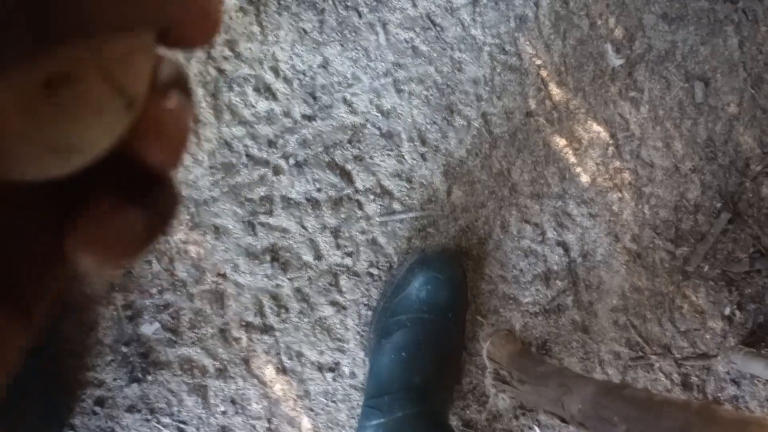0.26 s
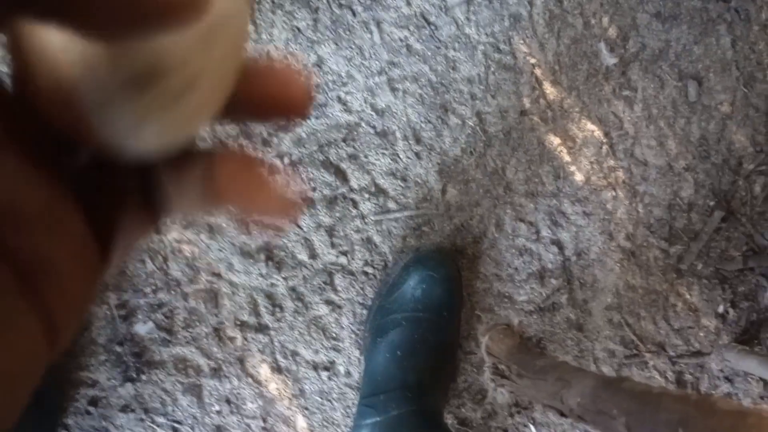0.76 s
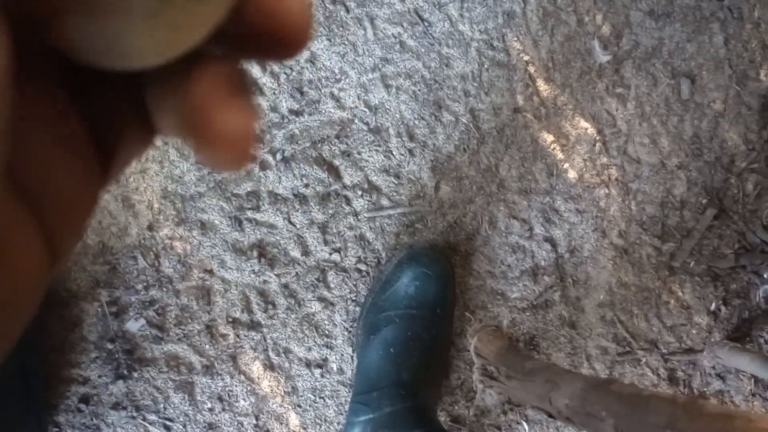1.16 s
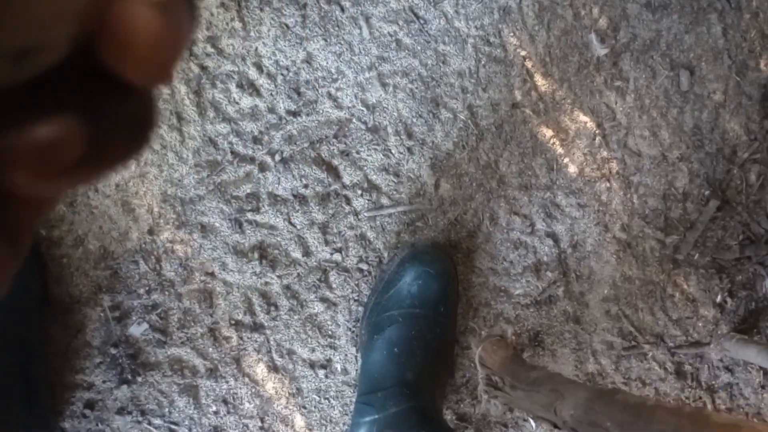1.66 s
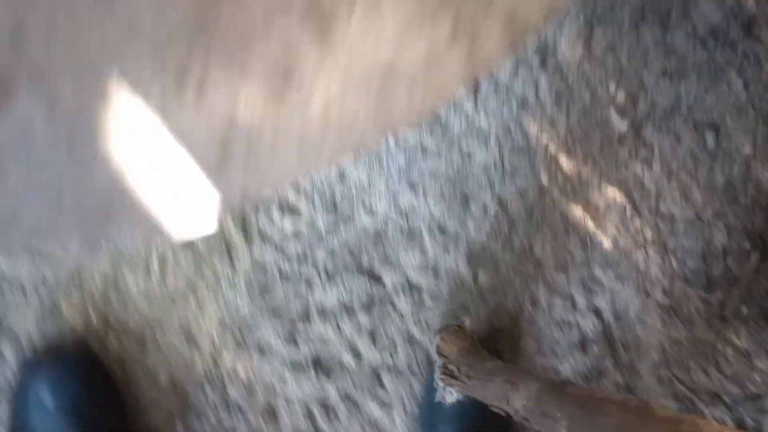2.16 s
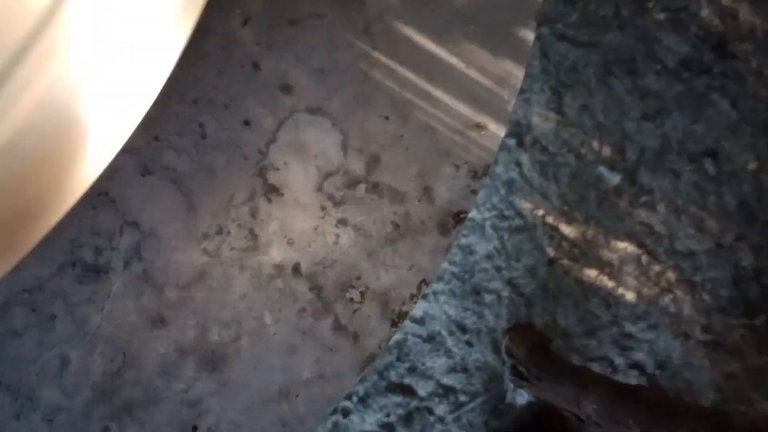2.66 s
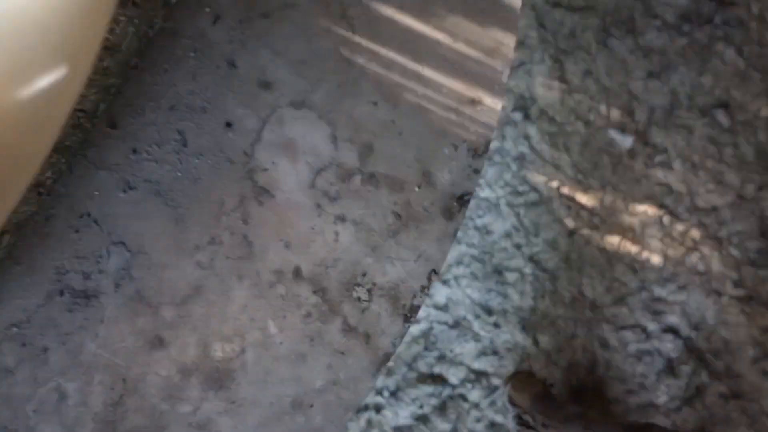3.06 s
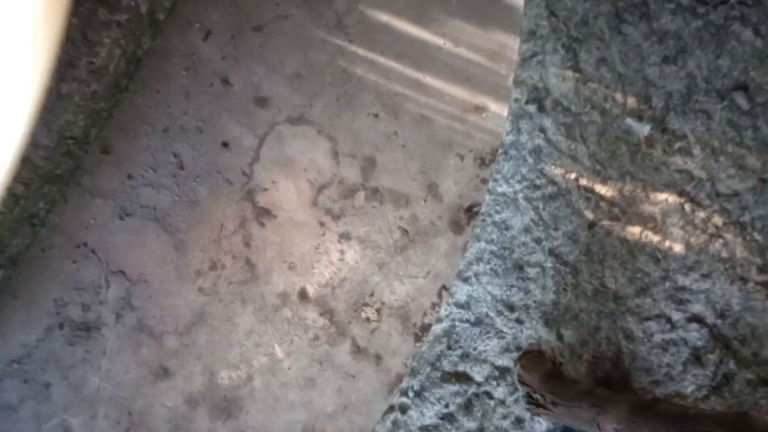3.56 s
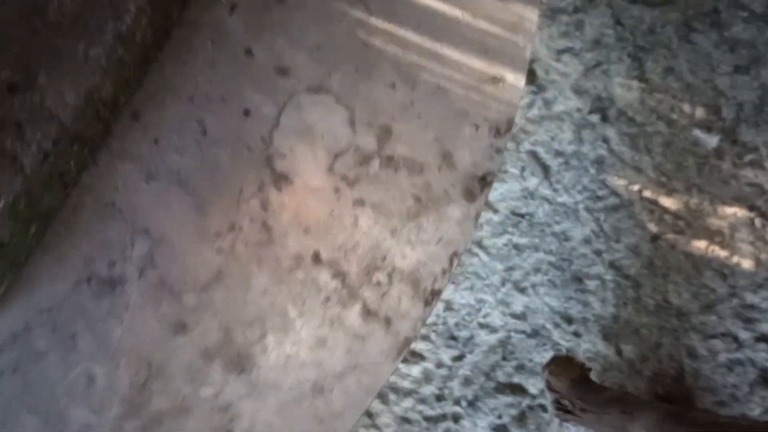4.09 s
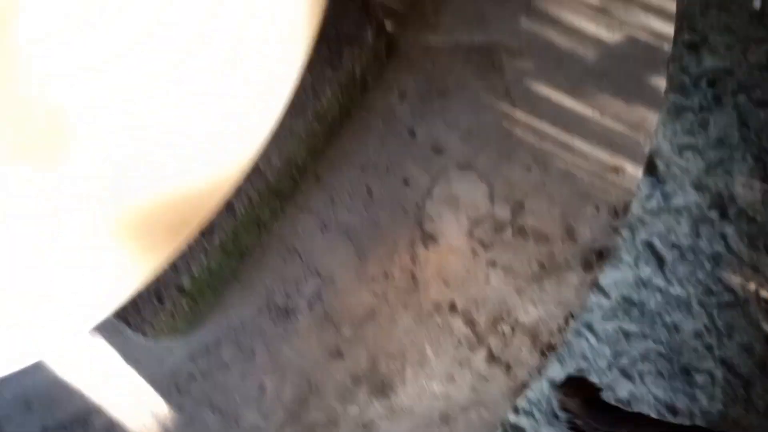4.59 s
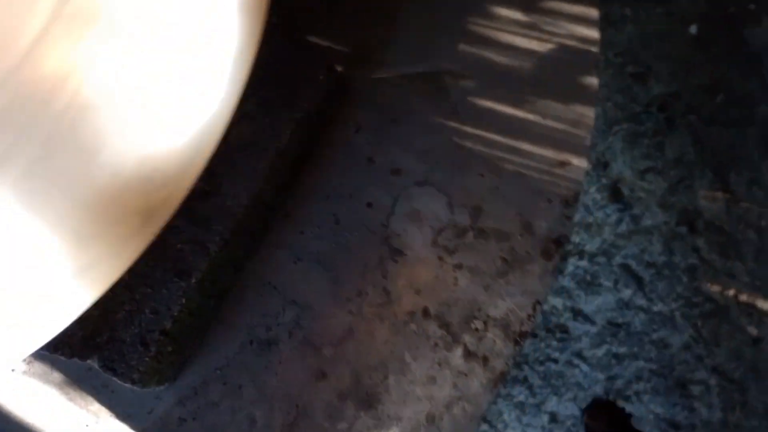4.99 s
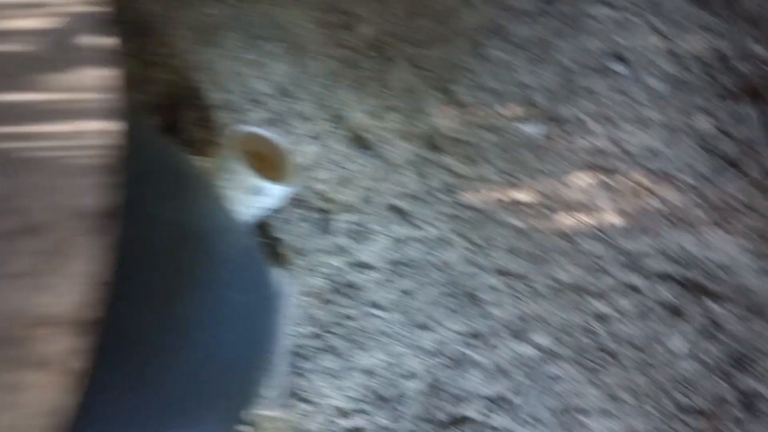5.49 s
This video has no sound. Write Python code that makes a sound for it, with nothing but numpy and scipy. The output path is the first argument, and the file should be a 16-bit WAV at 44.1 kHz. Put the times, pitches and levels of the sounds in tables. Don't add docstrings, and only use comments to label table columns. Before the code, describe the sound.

Faint falling whistles and far clucks in a quiet pen, then a harsh bird rattle, a sudden loud turkey gobble, and nearer rasping calls.

```python
import sys
import numpy as np
from scipy import signal
from scipy.fft import rfft, irfft, next_fast_len
from scipy.io import wavfile
from scipy.ndimage import uniform_filter1d, minimum_filter1d

SR = 44100
rng = np.random.default_rng(int(sys.argv[2]) if len(sys.argv) > 2 else 0)


def persist_wave(psi):
    counts = np.round(np.clip(psi, -1, 1) * 32767).astype(np.int16)
    wavfile.write(sys.argv[1], SR, np.atleast_2d(counts).T)


def boost(x):
    u = np.asarray(x, float) / 20
    return 10 ** u


N = 253134

# (start [s], hold [s], level [dB], upper partials [dB], beak opening: 2nd over 1st partial [dB])
GOBBLE = [(2.55, 0.0067, -11.5, -31, 22), (2.565, 0.022, -6.5, -21, 16), (2.606, 0.015, -10, -20, 19.5),
          (2.629, 0.027, -23.5, -20.5, -10.5), (2.648, 0.0036, -31, -20, 30.5),
          (2.666, 0.003, -10.5, -30.5, -26.5), (2.712, 0.022, -27.5, -27.5, 3),
          (2.777, 0.044, -18, -30.5, -2), (2.819, 0.011, -12.5, -16.5, -7.5),
          (2.84, 0.033, -18, -23.5, -7.5), (2.881, 0.0044, -29.5, -30, -6.5), (2.92, 0.0089, -31, -38.5, 8),
          (2.973, 0.0046, -19, -27, 1.5), (2.993, 0.0052, -26, -34.5, -7.5), (3.053, 0.035, -24, -28, -7),
          (3.122, 0.016, -28.5, -29, -1), (3.176, 0.018, -25.5, -30.5, -2.5),
          (3.227, 0.036, -24.5, -27, -4.5), (3.262, 0.033, -40, -35.5, 21),
          (3.315, 0.0039, -25.5, -47.5, 22), (3.397, 0.041, -25.5, -25, -4)]
# (time [s], pitch [Hz])
GOBBLE_PITCH = [(2.55, 610), (2.566, 625), (2.575, 694.4), (2.598, 687.6), (2.61, 627.5), (2.626, 717),
                (2.644, 774.7), (2.7, 735.4), (2.718, 701), (2.76, 665), (2.782, 660), (2.822, 638),
                (2.838, 766), (2.85, 783.6), (2.864, 809), (2.875, 770.3), (2.886, 631), (2.91, 632),
                (2.925, 681), (2.946, 627), (2.97, 642), (3.02, 658.6), (3.052, 635.6), (3.075, 697),
                (3.095, 680), (3.105, 647.5), (3.122, 658), (3.133, 711), (3.15, 706.5), (3.165, 680.5),
                (3.19, 640), (3.215, 629.6), (3.228, 668.5), (3.255, 690), (3.268, 635.5), (3.292, 637),
                (3.31, 653), (3.325, 600), (3.345, 555.4), (3.396, 633.7), (3.415, 696.5), (3.434, 663),
                (3.48, 640)]
# (multiple, level [dB])
GOBBLE_UPPER = [(4, 10), (5, 10), (6, 5), (7, -12), (8, -25.5)]
# (start [s], hold [s], level [dB])
BOOMS = [
    (2.517, 0.019, -50),
    (2.674, 0.1, -50),
    (2.873, 0.037, -41.5),
    (3.014, 0.095, -45),
    (3.157, 0.13, -44.5),
    (3.353, 0.036, -44),
]
# (start [s], hold [s], effort [dB], throat peak
# [Hz])
RATTLE_NOTES = [(1.415, 0.14, -67.5, 3700), (1.555, 0.19, -60, 3900), (1.75, 0.0086, -41, 2830),
                (1.837, 0.019, -35.5, 2640), (1.946, 0.0041, -40, 3200), (2.045, 0.014, -44, 3000),
                (2.153, 0.0021, -40.5, 3200), (2.261, 0.023, -43.5, 2760), (2.349, 0.014, -41.5, 2720),
                (2.44, 0.017, -44, 2910), (2.496, 0.044, -41.5, 4160), (2.625, 0.024, -28, 3470),
                (2.752, 0.0026, -23.5, 3530), (2.9, 0.0046, -29, 3230), (2.946, 0.0089, -23.5, 3600),
                (3.135, 0.0068, -25, 3250), (3.258, 0.011, -25.5, 3440), (3.351, 0.014, -30.5, 4072),
                (3.461, 0.0057, -32, 2790), (3.568, 0.015, -31, 3134), (3.666, 0.018, -27.5, 3150),
               (3.793, 0.018, -29, 2760), (3.97, 0.03, -25.5, 4040), (4.042, 0.0043, -26.5, 4460),
               (4.107, 0.037, -21, 3520), (4.206, 0.04, -20.5, 3880), (4.294, 0.37, -26.5, 3760),
               (4.801, 0.016, -23, 4310), (4.936, 0.011, -21, 3970), (5.187, 0.038, -24, 3820),
               (5.595, 0.026, -25, 2950), (5.615, 0.069, -26.5, 3700)]
# (frequency [Hz], level [dB per Hz])
RATTLE_COLOUR = [(290, -66), (500, -21), (587, -34), (785, -8.5), (893, -7.5), (1040, -8), (1420, 9.5),
                 (2530, 3.5), (3070, -0.5), (3880, -0.5), (5400, -13.5), (6500, -23), (8450, -47),
                 (13300, -45), (15600, -62.5)]
# (frequency [Hz], level [dB per Hz])
HISS_COLOUR = [(2940, -13), (5000, 1.5), (7210, -10.5), (9050, -14), (12100, -25), (13900, -26),
               (15600, -43.5)]
# (centre [Hz], width [Hz], level [dB])
THROAT = [(1710, 216, -8), (2210, 32, 4.5), (3200, 190, 5), (4530, 590, 16.5)]
# (time [s], level above effort [dB])
NEARING = [(1.7, -11), (1.9, -27), (2.5, -11), (3.5, -3), (4.27, -8.5), (4.33, -10.5), (4.52, -19.5),
           (4.57, -10.5), (4.85, -6), (5.3, -6)]
# (time [s], depth, negative = half a beat late)
TRILL = [(1.4, 0), (1.43, -.6), (1.52, -.6), (1.55, .65), (1.72, .65), (1.75, 0), (4.16, 0), (4.19, .5),
         (4.23, .2), (4.28, .2), (4.3, .8), (4.47, .75), (4.56, .5), (4.6, .3), (4.72, .5), (4.8, 0)]
# (start [s], hold [s], level [dB], pitch [Hz])
HUM = [(4.003, 0.0067, -54, 310), (4.115, 0.018, -49.5, 312), (4.19, 0.049, -46.5, 308),
       (4.245, 0.29, -46.5, 306), (4.6, 0.095, -53.5, 306), (4.815, 0.031, -53.5, 310),
       (4.95, 0.047, -49.5, 310), (5.212, 0.021, -45, 315), (5.625, 0.13, -54, 312)]
# (start [s], hold [s], level [dB], pitch [Hz])
PIPE = [(1.45, 0.055, -60.5, 1355), (1.56, .14, -56, 1340), (1.765, 0.016, -46, 1390),
        (1.862, 0.016, -45, 1365), (1.972, 0.0056, -50.5, 1400), (2.075, 0.0043, -54, 1400),
        (3.488, 0.0035, -36, 1360), (3.51, 0.24, -48, 1385), (3.785, 0.034, -31.5, 1390),
        (3.86, 0.043, -43, 1405), (3.985, 0.042, -44, 1400), (4.048, 0.0033, -32, 1390),
        (4.11, 0.03, -50.5, 1300), (4.325, 0.045, -25, 1400), (4.43, 0.074, -32, 1509),
        (4.57, 0.07, -30, 1376), (4.66, 0.061, -39, 1499), (4.942, 0.011, -55, 1475),
        (5.583, 0.063, -34, 1347)]
# (multiple, level [dB])
PIPE_PARTIALS = [
    [(1, 0), (2, -8), (3, -1), (4, -25)],
    [(1, 0), (2, -15), (3, -18)],
]
# (start [s], hold [s], level [dB], pitch [Hz])
SIGH = [
    (3.515, 0.088, -41.5, 3613),
    (3.6, 0.095, -40.5, 3354),
    (3.7, 0.15, -43, 3200),
    (3.82, 0.028, -45.5, 3166),
    (3.9, 0.057, -48.5, 3490),
]
# (start [s], hold [s], level [dB], pitch [Hz])
PIPS = [(1.277, .015, -74, 2500), (1.289, .015, -62, 3090), (1.417, .015, -59.5, 2250),
        (1.566, 0.16, -65, 2160), (1.791, 0.024, -76, 2790), (1.781, 0.036, -46, 4050),
        (1.86, 0.024, -60, 940), (1.975, 0.0078, -41, 3240), (2.069, 0.018, -44, 3200),
        (2.091, 0.0094, -44.5, 3990), (2.169, 0.038, -45.5, 3200), (2.172, 0.019, -47, 2675),
        (2.265, 0.04, -49, 2770), (2.558, 0.0037, -31, 1304), (2.653, 0.011, -15.5, 1322),
        (2.71, 0.035, -26, 1338), (2.761, 0.014, -25, 3102), (2.894, 0.013, -31.5, 1230),
        (2.934, 0.011, -23, 1217), (3.046, 0.011, -36, 1090), (3.132, 0.053, -36.5, 2630),
        (3.165, .03, -32.5, 2880), (2.931, 0.012, -34, 2860), (2.932, 0.0089, -30, 3400),
        (3.312, .012, -22.5, 1192), (3.228, .02, -31, 3630), (3.246, .02, -36.5, 2820),
        (3.392, 0.063, -38, 2720), (3.062, 0.03, -31, 2756), (0.77, 0.025, -72, 4080),
        (0.771, 0.039, -74, 1343), (0.793, 0.011, -65.5, 2635), (1.02, .015, -64, 4130),
        (1.02, 0.012, -64, 1350), (1.255, 0.012, -59.5, 2060), (1.782, 0.035, -61, 5450),
        (1.751, 0.012, -54, 2300), (1.85, 0.013, -48, 2050), (1.957, 0.013, -58, 1900),
        (2.049, 0.017, -60, 2000), (2.161, 0.013, -48.5, 2200), (2.371, .02, -42, 2250),
        (2.402, 0.03, -51.5, 1700), (3.223, 0.016, -25.5, 1131), (3.393, 0.0095, -20, 4162),
        (3.487, 0.029, -35, 2730), (3.497, 0.059, -32, 4100), (3.577, 0.0098, -32, 2230),
        (3.605, 0.023, -42, 2690),
        (3.955, 0.016, -43, 2420), (3.985, 0.014, -36, 2704), (3.975, 0.006, -33.5, 3430),
             (3.995, 0.028, -34, 4440), (4.01, .02, -44, 1920), (4.075, 0.023, -47, 2550),
             (4.075, .025, -38, 4110), (4.145, 0.018, -30, 1874), (4.3, .26, -33, 3153),
             (4.47, 0.095, -45, 3590), (4.53, 0.078, -31.5, 2250), (4.47, 0.075, -29.5, 1657),
             (4.65, 0.097, -36.5, 1809), (4.76, 0.042, -55.5, 2205), (4.805, 0.019, -35.5, 2174),
             (4.83, 0.038, -39.5, 1890), (4.815, 0.054, -38.5, 1518), (4.936, .02, -44.5, 3200),
             (4.965, 0.034, -25.5, 3843), (4.99, 0.015, -37, 2090), (5.07, 0.064, -51, 1828),
             (5.085, 0.056, -50, 1577), (5.185, 0.028, -45, 2655), (5.2, 0.037, -48.5, 965),
             (5.21, 0.06, -37.5, 3367), (5.255, .015, -27.5, 1840), (5.425, .025, -56.5, 1155),
             (5.59, 0.041, -35, 2360), (5.61, 0.096, -54.5, 960)]
# (start [s], length [s], level [dB], first pitch [Hz], resting pitch [Hz])
WHISTLES = [
    (0.0, 0.45, -56, 2240, 1430),
    (0.565, 0.68, -59.5, 2476, 1315),
    (1.303, 0.29, -67, 1950, 1090),
]
# (multiple, level [dB])
WHISTLE_PARTIALS = [(1, 0), (2, -33), (4, -32)]
# (start [s], level [dB], low resonance [Hz], high resonance [Hz], length [s])
CLUCKS = [(.0, -70.5, 2120, 3470, 0.11), (0.047, -54.5, 1590, 2040, 0.028),
          (0.445, -54, 2370, 2750, 0.0087), (0.734, -75, 2260, 3200, 0.053),
          (0.973, -68, 2225, 2610, 0.074), (1.013, -73, 1340, 3510, 0.023), (0.45, -80, 1340, 1340, 0.027),
          (1.257, -65.5, 2250, 2660, 0.072), (1.4, -71.5, 2230, 2600, 0.36)]
# (start [s], level [dB], centre [Hz], rise [s], t60 [s])
SCUFFS = [(.0, -67, 522.5, 0.00224, 0.48), (0.036, -70, 4800, 0.036, 0.24), (0.381, -66, 5050, 0.058, 0.2),
          (0.5853, -70, 7700, 0.0012, 0.12), (2.5623, -30, 3870, 0.001, 0.0074),
          (5.3, -64, 2010, 0.011, 0.28), (0.738, -59, 850, 0.0012, 0.1), (0.741, -69, 5440, 0.00049, 0.15),
          (2.278, -72.5, 330, 0.033, 1), (2.291, -63.5, 845, 0.072, 1), (2.836, -36, 285, 0.00053, 0.093),
          (3.011, -39, 364.6, 0.0076, 0.2), (3.19, -50.5, 229, 0.022, 0.9), (3.7, -70, 293, 0.029, 0.44),
          (5.2, -63, 503, 0.019, 0.12), (3.891, -45.5, 277, 0.007, 0.11), (5.218, -43.5, 120.7, 0.11, 0.52),
          (5.291, -37.5, 365, 0.021, 0.27), (5.34, -32, 309, 0.032, 0.087), (5.366, -36, 338, 0.016, 0.081),
          (5.302, -42, 1170, 0.068, 0.13), (5.4, -44, 97, 0.033, 0.15), (5.447, -70, 2440, 0.0063, 1)]
# (frequency [Hz], level [dB per Hz])
FLOOR_COLOUR = [(20, -28.5), (49, -11), (110, -6), (300, -15), (800, -26), (2000, -24), (4000, -29.5),
                (15600, -35.5)]
# (frequency [Hz], level [dB])
WALLS = [(100, -21), (900, 5), (3000, 6)]
LAGS_SAMPLES = (6, -8)
# (time [s], right port delay [samples])
SWAY = [(2.6, 14), (3.2, 11), (3.7, 18), (4.2, 12), (5.2, 14), (5.65, 18)]
# (frequency [Hz], left over right [dB])
PORTS = [(60, -1), (130, -1), (290, 2), (640, 1.5), (1410, 0), (3100, -9), (6820, 6), (15000, -5)]

SYLLABLE_RISE_S, SYLLABLE_FALL_DB_PER_S, SYLLABLE_SAG_DB_PER_S = 0.0045, 1150, 86
FIRST_LATE_S = .003
BOOM_RISE_S, BOOM_FALL_DB_PER_S = 0.063, 660
NOTE_RISE_S, NOTE_FALL_DB_PER_S, NOTE_SAG_DB_PER_S = 0.032, 244, 3.5
NOTE_TAIL_DB, TAIL_FALL_DB_PER_S = -17, 111
SHUT, OPEN_S, SAG_HZ_PER_S = .38, .022, 500
FAR_PULSES_HZ, NEAR_PULSES_HZ, ARRIVES_S = 460, 308, 3.95
JOINED_S, WIDEN_S = .03, 0.01
PIPE_RISE_S, PIPE_FALL_DB_PER_S = 0.014, 353
PIP_RISE_S, PIP_FALL_DB_PER_S, PIP_FUZZ = 0.0057, 970, .45
GLIDE, WHISTLE_RISE_S, WHISTLE_FADE_DB, FADE_BEND = 1.85, 0.0037, -44.5, 1.75
DIP_HZ, DIP_WIDTH_HZ, DIP_DB = 1907, 106, -17.5
FLOOR_DB = -80


def gobble():
    start, hold, db, top_db, beak_db = np.transpose(GOBBLE)

    def level(late_s, peak_db):
        rows = swells(start + late_s, hold, peak_db, SYLLABLE_RISE_S, SYLLABLE_FALL_DB_PER_S,
                      SYLLABLE_SAG_DB_PER_S)
        return filled(rows.max(0))

    first_db = level(FIRST_LATE_S, db - np.maximum(beak_db, 0))
    second_db = level(0, db + np.minimum(beak_db, 0))
    upper_db = level(FIRST_LATE_S, top_db)
    t = np.arange(N) / SR
    hz = uniform_filter1d(np.interp(t, *np.transpose(GOBBLE_PITCH)), size=200)
    hz = hz * (1 + .012 * wobble(N, hz=70))
    upper = sum(stack(hz, [partial]) * boost(2.5 * wobble(N, hz=20)) for partial in GOBBLE_UPPER)
    air = patchy(coloured(rng.standard_normal(N), RATTLE_COLOUR), depth_db=-13)
    hiss = patchy(coloured(rng.standard_normal(N), HISS_COLOUR), depth_db=5)
    voiced = np.clip(.55 + (first_db - second_db) / 28, .1, .85)
    top = np.sqrt(voiced) * evened(upper) + np.sqrt(1 - voiced) * air + boost(-11) * hiss
    third = stack(hz, [(3, 0)]) * boost((second_db + upper_db) / 2 - 4)
    second = stack(hz, [(2, 0)]) * boost(second_db + 3.2 * wobble(N, hz=50))
    first = stack(hz, [(1, 0)]) * boost(first_db + 1.5 * wobble(N, hz=40))
    rasp = 1 + .3 * wobble(N, hz=220)
    beak = coloured(rasp * (second + third), [(500, -35.5), (950, -0.5)])
    return np.sqrt(abs(rasp)) * first + beak + boost(upper_db) * top


def drum():
    db = filled(swells(*np.transpose(BOOMS), BOOM_RISE_S, BOOM_FALL_DB_PER_S).max(0))
    boom = stack(76 * (1 + 0.12 * wobble(N, hz=26)), [(1, 4.5), (2, -8.5)])
    return uniform_filter1d(boost(db), size=500) * coloured(boom, [(42, -21), (62, 2.5)])


def rattle():
    start, hold, effort_db, throat_hz = np.transpose(RATTLE_NOTES)
    levels = swells(start, hold, effort_db, NOTE_RISE_S, NOTE_FALL_DB_PER_S, NOTE_SAG_DB_PER_S,
                    NOTE_TAIL_DB, TAIL_FALL_DB_PER_S)
    db, loudest = filled(levels.max(0)), levels.argmax(0)
    age_s = np.maximum(np.arange(len(loudest)) / 1000 - start[loudest], 0)
    peak_hz = throat_hz[loudest] * (1 - SHUT * np.exp(-age_s / OPEN_S)) - SAG_HZ_PER_S * age_s
    peak_hz = filled(np.maximum(peak_hz, 1500))

    t = np.arange(N) / SR
    pulse_hz = np.where(t < ARRIVES_S, FAR_PULSES_HZ, NEAR_PULSES_HZ)
    turns = np.cumsum(pulse_hz * (1 + .045 * wobble(N, hz=151))) / SR
    pulses = np.diff(np.floor(turns), prepend=0) * boost(2.5 * rng.standard_normal(N))
    puffs = (0.044 + np.exp(-(turns % 1) / 0.13)) * rng.standard_normal(N)
    drive = .6 * evened(pulses) + .7 * evened(puffs)

    starts = np.append(0, start)
    note = np.searchsorted(starts, t, side="right") - 1
    note_age_s = t - starts[note]
    setting = rng.standard_normal((len(starts), len(THROAT), 2))[note]
    opening = 1 - .25 * np.exp(-note_age_s / .025)
    rings = 0
    for k, (hz, width_hz, ring_db) in enumerate(THROAT):
        ring = resonate(drive, hz * opening * (1 + 0.06 * setting[:, k, 1]), width_hz)
        rings = rings + boost(ring_db + 3 * setting[:, k, 0]) * ring
    mouth = steady(resonate(resonate(drive, peak_hz, 420), peak_hz, 420))
    wide = .5 * evened(coloured(drive, RATTLE_COLOUR)) + 1.185 * steady(coloured(rings, RATTLE_COLOUR))

    near_db = np.interp(t, *np.transpose(NEARING))
    hiss = patchy(coloured(puffs, HISS_COLOUR), depth_db=5) * boost(near_db)
    farness = 1 - np.minimum(boost(near_db + 14), 1)
    wide = wide - farness * coloured(wide, [(1200, 0), (1900, -30)])
    previous_end = np.append(0, start + hold + NOTE_RISE_S)[:-1]
    fresh = np.append(1, start - previous_end > JOINED_S)[note]
    spread = 1 - fresh * np.exp(-(note_age_s / WIDEN_S) ** 2)
    slack_db = db + minimum_filter1d(-db, size=6000)
    voice = .45 * mouth + spread * boost(.4 * slack_db) * (wide + boost(.5 * slack_db) * hiss)
    hum = pipe(HUM, [(1, 0), (2, -15), (3, -10)], jitter=.004, throb=.08, throb_hz=41.3)
    return boost(db - 8) * flutter() * coloured(voice, [(300, -40.5), (800, -1)]) + hum


def flutter():
    t = np.arange(N) / SR
    depth = np.interp(t, *np.transpose(TRILL))
    chop = np.tanh(2 * np.cos(2 * np.pi * 41.17 * (t - 4.312)))
    return (1 + depth * chop) / np.sqrt(1 + depth ** 2 / 2)


def pipe(rows, partials, **voice):
    start, hold, db, hz = np.transpose(rows)
    level_db = filled(swells(start, hold, db, PIPE_RISE_S, PIPE_FALL_DB_PER_S).max(0))
    return line(glide(start, hold, hz), level_db, partials, **voice)


def pips():
    out = np.zeros(N + SR)
    for start, hold, db, hz in PIPS:
        t = np.arange(0, hold + .08, 1 / SR)
        slow = uniform_filter1d(rng.standard_normal((2, SR // 2)), size=250)
        waver, fuzz = (evened(v)[:len(t)] for v in slow)
        turns = np.cumsum(hz * (1 - 0.036 * np.exp(-t / 0.0067) + 0.0071 * waver)) / SR
        shape = np.minimum(t / PIP_RISE_S, 1) * boost(db - PIP_FALL_DB_PER_S * np.maximum(t - hold, 0))
        tone = np.sqrt(2) * np.sin(2 * np.pi * turns)
        out[round(start * SR):][:len(t)] += shape * (1 - PIP_FUZZ + PIP_FUZZ * fuzz) * tone
    return flutter() * out[:N]


def other_fowl():
    early = pipe(PIPE[:7], PIPE_PARTIALS[0], jitter=.01, throb=.3, throb_hz=58, fuzz=.3) * flutter()
    later = pipe(PIPE[7:], PIPE_PARTIALS[1], jitter=.008, throb=.15, throb_hz=41.3, fuzz=.3)
    later = later * flutter() ** .7 * boost(-3)
    sigh = pipe(SIGH, [(0.98, -3), (1.96, -20.5)], jitter=0.0098, throb=0.18, throb_hz=37.1, fuzz=1)
    return early + later + sigh * boost(2) + pips()


def whistles():
    start, length, db, top_hz, rest_hz = np.transpose(WHISTLES)
    t = np.arange(N) / SR
    k = np.maximum(np.searchsorted(start, t, side="right") - 1, 0)
    age_s = np.maximum(t - start[k], 1e-6)
    part = age_s / length[k]
    hz = rest_hz[k] + (top_hz - rest_hz)[k] * np.exp(-GLIDE * part)
    level_db = db[k] + 20 * np.log10(np.minimum(age_s / WHISTLE_RISE_S, 1))
    level_db = level_db + WHISTLE_FADE_DB * part ** FADE_BEND - 60 * (age_s > length[k])
    level_db = level_db + DIP_DB * np.exp(-((hz - DIP_HZ) / DIP_WIDTH_HZ) ** 2)
    return line(hz, level_db, WHISTLE_PARTIALS, jitter=0.0026, throb=0.36, throb_hz=43.3)


def clucks():
    out = np.zeros(N + SR)
    for start, db, low_hz, high_hz, length in CLUCKS:
        t = np.arange(0, 2 * length, 1 / SR)
        drive = rng.standard_normal(len(t))
        swell = np.sin(np.pi * np.minimum(t / length, 1)) ** 2
        bands_hz = (low_hz, (low_hz + high_hz) / 2, high_hz)
        low, middle, high = (evened(resonate(resonate(drive, hz, 220), hz, 220)) for hz in bands_hz)
        rings = low + .6 * swell * middle + (0.11 + 1.6 * swell) * high
        shape = np.minimum(t / 0.0036, 1) * np.exp(-(t / length) ** 2 * 0.43)
        out[round(start * SR):][:len(t)] += boost(db) * rings * shape
    return out[:N]


def scuffs():
    out, t = np.zeros((2, N + SR)), np.arange(SR // 2) / SR
    for start, db, hz, rise, t60 in SCUFFS:
        width_hz = 0.95 * hz
        noise = rng.standard_normal((3, len(t)))
        shared, left, right = (evened(resonate(resonate(v, hz, width_hz), hz, width_hz)) for v in noise)
        shape = np.minimum(t / rise, 1) ** 2 * boost(db - 60 * np.maximum(t - rise, 0) / t60)
        out[:, round(start * SR):][:, :len(t)] += shape * (shared + 0.55 * np.array([left, right]))
    return out[:, :N]


def floor():
    noise = rng.standard_normal((3, N))
    hiss = evened(coloured(noise[:2] + 0.37 * noise[2], FLOOR_COLOUR))
    return boost(FLOOR_DB + 1.4 * wobble(N, hz=16)) * hiss


def pen(x, wet_db, lag_samples, left_db, t60_s=0.14):
    t = np.arange(SR // 3) / SR
    signs = rng.choice([-1., 1.], (2, len(t)))
    taps = signs * (rng.random((2, len(t))) < .05) * boost(-60 * t / t60_s) * (t > .002)
    taps = taps / np.linalg.norm(taps[0])
    echoes = signal.fftconvolve(coloured(x, WALLS)[None], taps, axes=1)[:, :N]
    late = x[np.clip(np.arange(N) - np.round(lag_samples).astype(int), 0, N - 1)]
    direct = np.array([x, late]) * boost([[left_db / 2], [-left_db / 2]])
    return (direct + boost(wet_db) * echoes) / np.sqrt(1 + boost(2 * wet_db))


def evened(x):
    return x / np.sqrt(np.mean(x ** 2) + 1e-20)


def steady(x):
    return x / np.sqrt(abs(uniform_filter1d(x ** 2, size=1500)) + 1e-12)


def coloured(x, points):
    point_hz, db = np.transpose(points)
    count = x.shape[-1]
    size = next_fast_len(count + 4096)
    hz = np.fft.rfftfreq(size, 1 / SR)
    gain = boost(np.interp(np.log(hz + 1), np.log(point_hz + 1), db))
    return irfft(rfft(x, size) * gain, size)[..., :count]


def resonate(x, hz, width_hz):
    turn = np.exp(2j * np.pi * np.cumsum(hz * np.ones(len(x))) / SR)
    r = np.exp(-np.pi * width_hz / SR)
    return 2 * (turn * signal.lfilter([1 - r], [1, -r], x / turn + 1e-18)).real


def wobble(count, hz):
    r = np.exp(-2 * np.pi * hz / SR)
    return evened(signal.lfilter([1], np.poly([r, r]), rng.standard_normal(count)))


def patchy(x, depth_db):
    z = signal.stft(x, nperseg=512)[2]
    patches = uniform_filter1d(rng.standard_normal(z.shape), size=4, axis=0)
    patches = uniform_filter1d(patches, size=7, axis=1)
    return evened(signal.istft(z * boost(depth_db * evened(patches)), nperseg=512)[1][:N])


def stack(hz, partials):
    turns = np.cumsum(hz) / SR
    return np.sqrt(2) * sum(boost(db) * np.sin(2 * np.pi * (k * turns + rng.random())) for k, db in partials)


def line(hz, db, partials, jitter, throb, throb_hz, fuzz=0):
    beat_turns = np.cumsum(throb_hz * (1 + 0.14 * wobble(N, hz=13.96))) / SR
    beat = 1 + throb * np.cos(2 * np.pi * beat_turns)
    hz = hz * (1 + jitter * wobble(N, hz=59.4))
    tone = 0
    for partial in partials:
        breath = 1 - fuzz + fuzz * wobble(N, hz=120)
        tone = tone + stack(hz, [partial]) * breath * boost(2.5 * wobble(N, hz=25))
    return boost(db) * beat * tone


def glide(start, hold, hz):
    return np.interp(np.arange(N) / SR, start + hold / 2 + 0.011, hz)


def swells(start, hold, db, rise_s, fall, sag=0, tail_db=-104.5, tail_fall=0):
    age_s = np.arange(N * 1000 // SR + 2) / 1000 - start[:, None]
    after_s = np.maximum(age_s - rise_s - hold[:, None], 0)
    rise_db = 20 * np.log10(np.clip(age_s / rise_s, 1e-5, 1))
    sag_db = sag * np.maximum(age_s - after_s, 0)
    return db[:, None] + rise_db - sag_db + np.maximum(-fall * after_s, tail_db - tail_fall * after_s)


def filled(curve):
    return np.interp(np.arange(N) / SR * 1000, np.arange(len(curve)), curve)


def scene():
    tom_lag, far_lag = LAGS_SAMPLES
    sway = np.interp(np.arange(N) / SR, *np.transpose(SWAY))
    tom = pen(coloured(gobble(), [(380, -52), (560, 0)]), wet_db=-7, lag_samples=tom_lag, left_db=0.5, t60_s=0.08)
    chest = pen(drum(), wet_db=7, lag_samples=0, left_db=1.5)
    fowl = pen(rattle(), wet_db=1, lag_samples=sway, left_db=-2, t60_s=.055)
    others = pen(other_fowl(), wet_db=-3, lag_samples=sway, left_db=-1, t60_s=.04)
    far = pen(whistles() + clucks(), wet_db=6.5, lag_samples=far_lag, left_db=-10.5)
    return tom + chest + fowl + others + far + scuffs() + floor()


def low_pass(x):
    return signal.sosfilt(signal.butter(12, 15710, fs=SR, output="sos"), x)


def record(dry):
    ports = [coloured(v, [(hz, side * db / 2) for hz, db in PORTS]) for v, side in zip(dry, (1, -1))]
    cut = coloured(np.array(ports), [(28, -44), (50, -10), (65, 0)])
    mix = 0.9 * np.tanh(cut)
    return low_pass(mix)


dry = scene()
out = record(dry)
persist_wave(out)
```